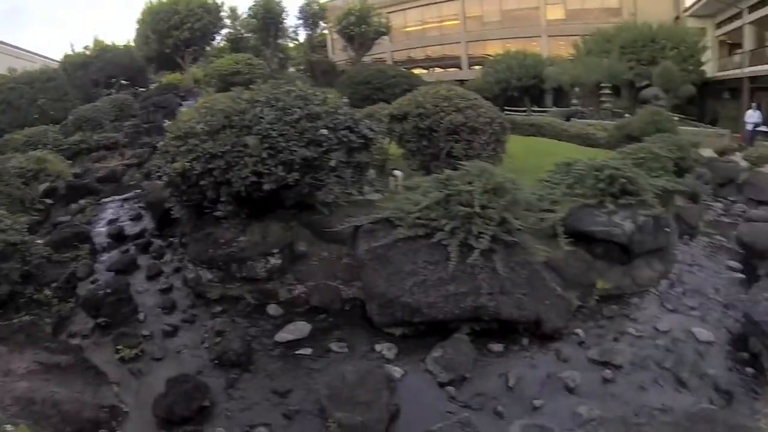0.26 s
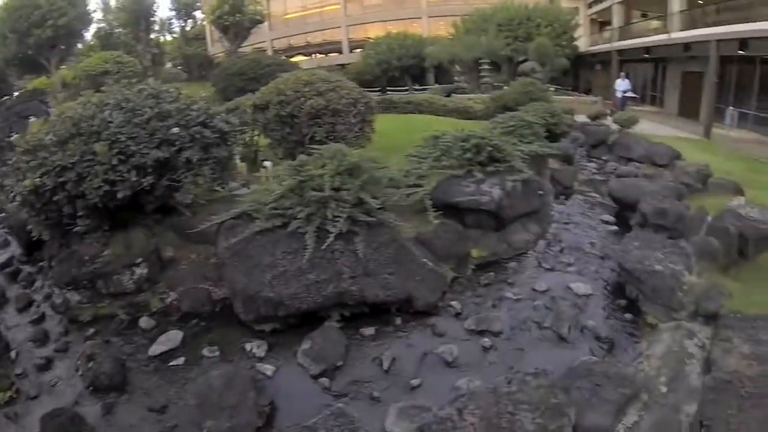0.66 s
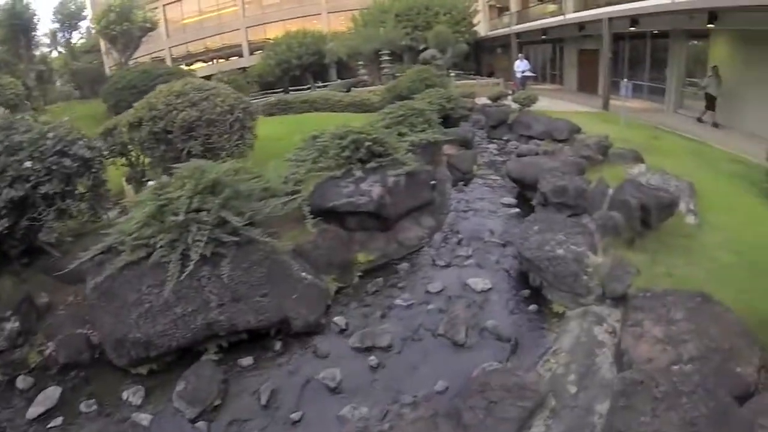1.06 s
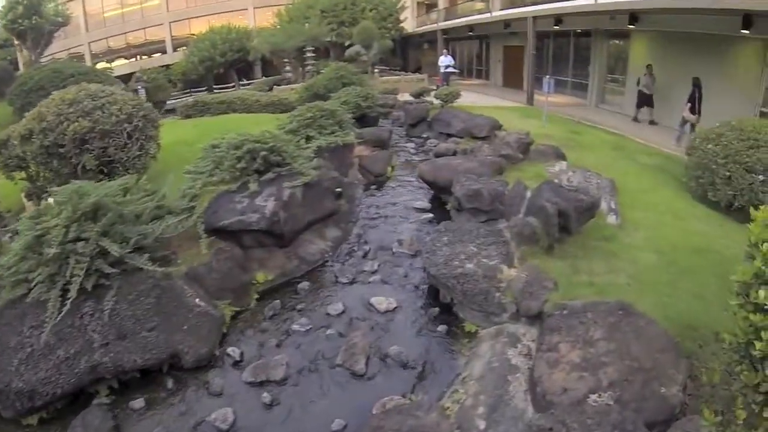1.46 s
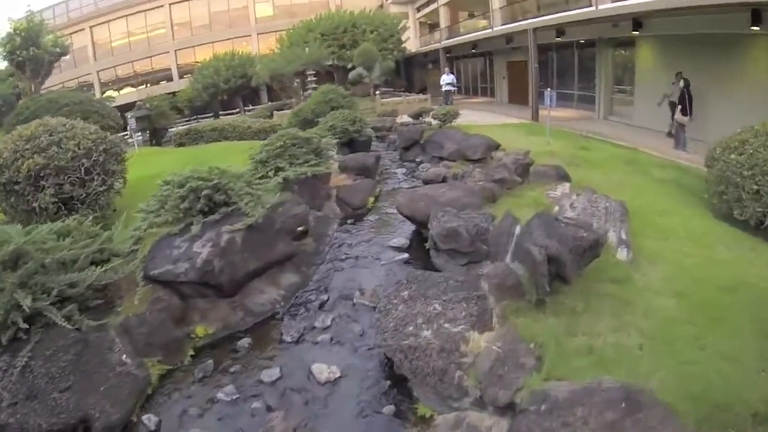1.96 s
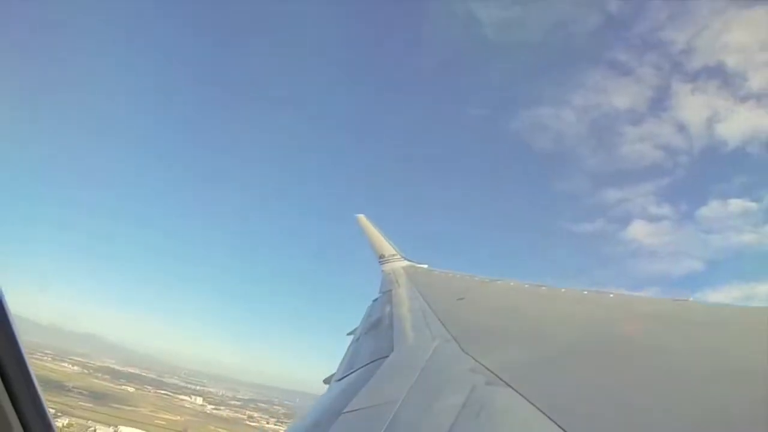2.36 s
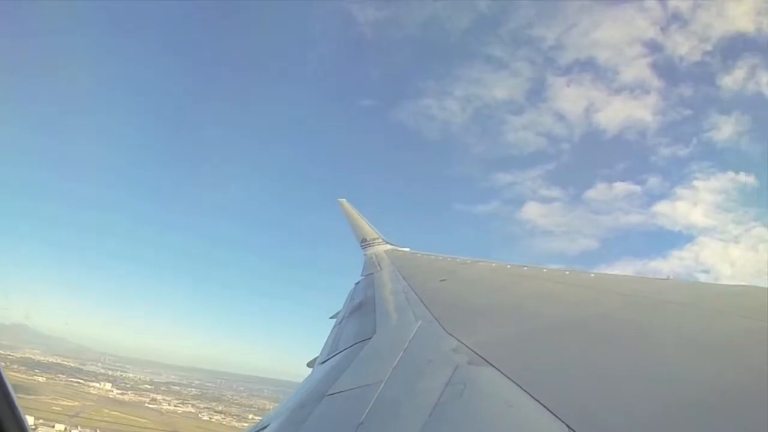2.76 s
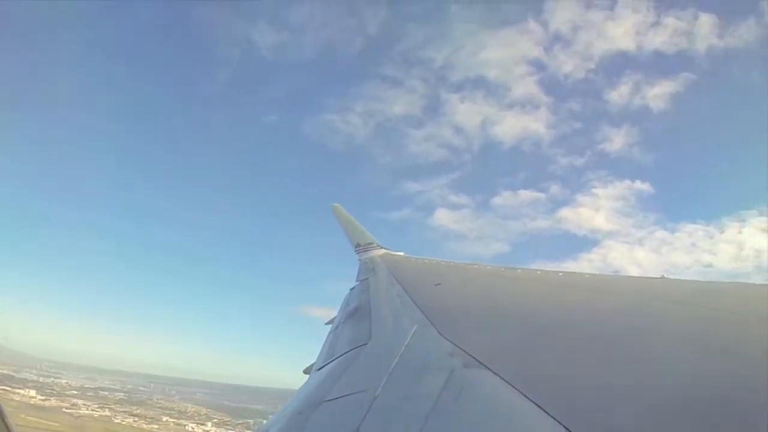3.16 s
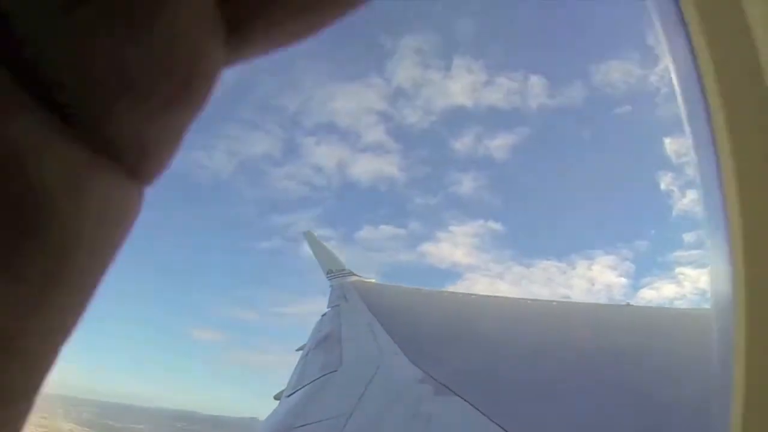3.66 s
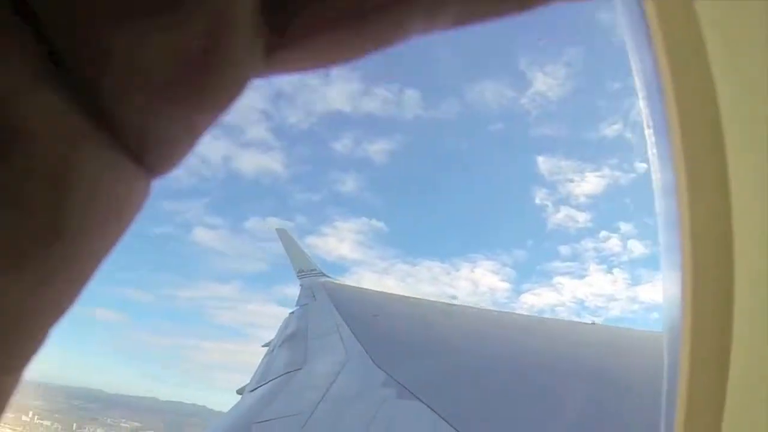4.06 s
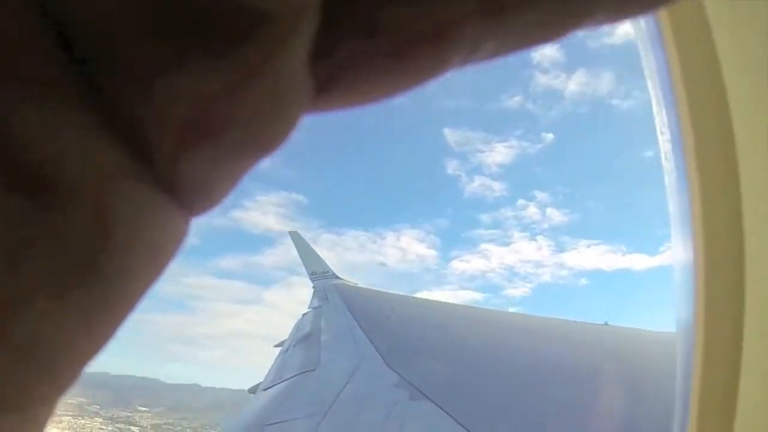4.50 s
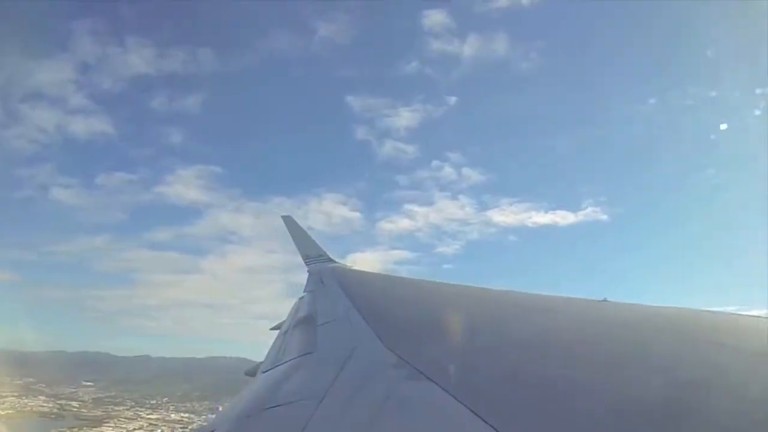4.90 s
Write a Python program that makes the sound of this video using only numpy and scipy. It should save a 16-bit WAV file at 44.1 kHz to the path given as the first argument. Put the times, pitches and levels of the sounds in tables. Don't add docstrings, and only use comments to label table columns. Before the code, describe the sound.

For the first two seconds, wind presses on a cased camera microphone in a garden: deep, lumpy, fluttering rumble, with only a dull, faint hush of distant air and water and a barely perceptible high electronic pulse. A cluster of small knocks comes near 0.2 s, another at 1.1 s, and a strong thump at 1.75 s. It fades to near silence around 2.05 s, and by 2.15 s a steady jet cabin roar has arrived, hollow and ringing through the window pane, with engine hum, faint fan whine and fine hiss. A soft bump comes at 3.55 s; around 3.6 s the roar swells briefly, then the ringing drops as the case lifts off. Finger ticks and brushes follow, an airy vent puff opens at 4.3 s with a faint thin whistle, and a sharp click with scratchy rubbing hits at 4.6-4.7 s. The case settles back, ringing returns, and the lows are thinner to the end.

```python
import sys
import numpy as np
from scipy import signal
from scipy.fft import rfft, irfft, next_fast_len
from scipy.io import wavfile
from scipy.ndimage import uniform_filter1d

SR = 44100
rng = np.random.default_rng(int(sys.argv[2]) if len(sys.argv) > 2 else 0)


def dump_mix(stems):
    frames = np.atleast_2d(stems).T
    limited = np.clip(frames, -1, 1)
    pcm = np.round(limited * 32767).astype(np.int16)
    wavfile.write(sys.argv[1], SR, pcm)


def amplitude_ratio(level_db):
    exponent = np.asarray(level_db, float) / 20
    return 10 ** exponent


N = 226432


def rms_one(x):
    return x / np.sqrt(np.mean(x ** 2) + 1e-30)


def in_time(rows):
    s, *columns = np.transpose(rows)
    return [np.interp(np.arange(N) / SR, s, column) for column in columns]


def ramp(start_s, end_s):
    return np.interp(np.arange(N) / SR, [start_s, end_s], [0, 1])


def drift(rate):
    r = np.exp(-80 * np.pi * rate / SR)
    slow = signal.lfilter([1], [1, -2 * r, r * r], rng.standard_normal(N // 40 + 2002))
    slow = slow[2000:]
    return np.interp(np.arange(N) / 40, np.arange(len(slow)), rms_one(slow))


def coloured(spectrum, patchy_db, low_hz, high_hz):
    size = next_fast_len(N, True)
    hz = np.maximum(np.fft.rfftfreq(size, 1 / SR), 1)
    point_hz, point_db = np.transpose(spectrum)
    level_db = np.interp(np.log(hz), np.log(point_hz), point_db)
    shape = rfft(rng.standard_normal(size)) * amplitude_ratio(level_db)
    in_band = irfft(shape * (hz > low_hz) * (hz < high_hz), size)
    out = np.zeros(N)
    for octave in range(int(np.log2(point_hz[0])), int(np.log2(point_hz[-1])) + 2):
        overlap = np.clip(1 - abs(np.log2(hz) - octave), 0, 1)
        out += irfft(shape * overlap, size)[:N] * amplitude_ratio(patchy_db * drift(8.2))
    return out / np.sqrt(np.mean(in_band ** 2))


def resonance(x, hz, width_hz):
    r = np.exp(-np.pi * width_hz / SR)
    zeros = np.array([1, 0, -1]) * (1 - r * r) / 2
    poles = [1, -2 * r * np.cos(2 * np.pi * hz / SR), r * r]
    return signal.lfilter(zeros, poles, x)


def ring_twice(x, hz, width_hz):
    return rms_one(resonance(resonance(x, hz, width_hz), hz, width_hz))


def whistle(hz, width_hz):
    return ring_twice(rng.standard_normal(N), hz, width_hz)


def tone(hz):
    return np.sqrt(2) * np.sin(2 * np.pi * (np.cumsum(hz + np.zeros(N)) / SR + rng.random()))


# f/Hz, level/dB per Hz
BUFFET_SPECTRUM = [(5.9, 3.5), (10, -1.5), (22, 1), (40, -9.5), (94, -23.5), (151, -39), (355, -55.5),
                   (411, -49), (500, -62), (650, -89), (1100, -120)]
# t/s, level/dB
GUST_STRENGTH = [(0.0, -24.5), (0.1, -34), (0.2, -26), (0.38, -29.5), (0.56, -22.5), (0.61, -33),
                 (0.66, -20), (0.75, -26), (0.86, -23), (1.2, -26.5), (1.28, -33), (1.35, -30),
                 (1.52, -32.5), (1.63, -20.5), (1.74, -31), (1.8, -23), (2.0, -21)]


def wind():
    gust_db, = in_time(GUST_STRENGTH)
    low_cut = signal.butter(2, 9, "high", fs=SR, output="sos")
    lumps = signal.sosfiltfilt(low_cut, coloured(BUFFET_SPECTRUM, 0.3, 10, 45))
    slow = signal.sosfiltfilt(signal.butter(4, 45, fs=SR, output="sos"), lumps)
    flutter = rms_one(lumps - slow)
    size = np.sqrt(uniform_filter1d(slow ** 2, size=3500) + 0.073)
    mean_gust_db = np.mean(np.array(GUST_STRENGTH)[:, 1])
    flutter_db = -36.5 + .1 * (gust_db - mean_gust_db)
    ebb_s = .008
    ebb = amplitude_ratio(-20) * np.exp(-np.arange(N) / SR / ebb_s)
    return ebb + ramp(0, 2 * ebb_s) * (amplitude_ratio(gust_db + 2.5) * slow / size + amplitude_ratio(flutter_db) * flutter)


# t/s, level/dB, push f/Hz, sign, rebound share
CASE_KNOCKS = [(0.21, -23.5, 550, -1, .2), (0.226, -26, 450, -1, 0.22), (0.2365, -26.5, 660, 1, 0.34),
               (0.247, -28, 600, -1.1, .2), (0.254, -33, 302, -1, .2), (1.116, -21, 495, 0.71, 0.45),
               (1.753, -30.5, 895, -0.89, .1), (1.754, -11.5, 600, 0.96, 0.2), (3.549, -22, 150, 1, .1),
               (4.154, -27, 500, 1, .1), (4.6276, -5, 3200, -0.78, 0.41)]


def knocks():
    out = np.zeros(N)
    for s, db, hz, sign, rebound in CASE_KNOCKS:
        rise = np.arange(int(25 * SR / hz)) * hz / SR
        late = np.maximum(rise - 1.6, 0) / 1.6
        push = (rise * np.exp(1 - rise)) ** 3
        swing_back = rebound * late * np.exp(1 - late)
        out[int(s * SR):][:len(push)] += sign * amplitude_ratio(db) * (push - swing_back)
    return signal.sosfilt(signal.butter(1, 60, "high", fs=SR, output="sos"), out)


# f/Hz, level/dB per Hz
ROAR_SPECTRUM = [(150, -50), (250, -10.5), (300, -10.5), (385, 1), (450, -6.5), (520, -17), (640, -6),
                 (800, -10), (960, -8), (1100, -8.5), (1430, -19.5), (2400, -120)]
# f/Hz, level/dB per Hz
UPPER_SPECTRUM = [(590, -7.5), (1000, -8), (1090, -21), (1190, -7), (1430, -13.5), (1590, -14),
                  (1810, -18.5), (2000, -13), (2370, -16), (2600, -22.5), (2940, -22.5), (3380, -32),
                  (5000, -65), (6500, -77), (11000, -120)]
# f/Hz, level/dB per Hz
HISS_SPECTRUM = [(2350, -11), (4000, -4), (4580, -11.5), (6820, -14.5), (7060, -16.5), (7560, -13.5),
                 (9120, -14.5), (9330, -12.5), (10700, -8), (11900, -0.5), (13100, -7), (14300, -9),
                 (15600, -14)]
# f/Hz, width/Hz, level/dB
PANE_MODES = [(84, 78, -24.5), (391.6, 39, -9.5), (502, 54, -9), (959, 73, -1.5), (1320, 110, -18.5),
              (1572, 57, -19.5), (1753, 17, -24.5)]
# f/Hz, width/Hz, level/dB
PANE_MODES_AGAIN = [(93, 52, -13.5), (383, 49, -7.5), (475, 31, -8), (931, 63, -1), (1073, 44, -8.5),
                    (1333, 88, -11), (1795, 15, -17.5), (2186, 54, -17)]
# t/s, level/dB
PANE_CONTACT = [(2.14, -25.5), (2.35, -24.5), (2.44, -27.5), (2.5, -24.5), (3.05, -28), (3.15, -23),
                (3.4, -25), (3.48, -34.5), (3.6, -21.5), (3.65, -35.5), (4.01, -40.5), (4.27, -40.5),
                (4.48, -44), (4.81, -33), (5.05, -24.5), (5.09, -31.5), (5.13, -23.5)]
# start t/s, end t/s
LIFT_S, SET_BACK_S = (3.6, 3.67), (4.73, 4.96)


def pane_ring(modes):
    return sum(amplitude_ratio(db) * whistle(hz, 1.73 * width_hz) for hz, width_hz, db in modes)


def cabin():
    t = np.arange(N) / SR
    pane_db, = in_time(PANE_CONTACT)
    firmer_db = pane_db + 25
    roar_db = -33.5 - 0.04 * firmer_db
    upper_db = -34.5 + .2 * firmer_db
    hiss_db = -53 + 0.058 * firmer_db
    roar_db += 4 * np.exp(-((t - 3.59) / 0.071) ** 2)
    roar_db -= 9 * ramp(*SET_BACK_S)
    moved_s = 4.3
    pane = np.where(t < moved_s, pane_ring(PANE_MODES), pane_ring(PANE_MODES_AGAIN))
    out = amplitude_ratio(roar_db - 1.5) * coloured(ROAR_SPECTRUM, 1.0, 200, 780)
    out += amplitude_ratio(pane_db - 1.5) * pane
    out += amplitude_ratio(upper_db) * coloured(UPPER_SPECTRUM, 0.8, 1180, 4000)
    return out + amplitude_ratio(hiss_db) * coloured(HISS_SPECTRUM, 0.63, 8200, 15200)


# f/Hz, width/Hz
PORT_RESONANCES = [(4000, 1800), (5700, 1600), (8000, 3400), (12500, 4700)]
# t/s, length/s, level/dB
FINGER_TICKS = [(2.571, .006, -43), (3.853, .0033, -41), (4.154, .0027, -40), (4.205, .003, -44),
                (3.838, .012, -51)]
FINGER_BRUSHES = [(3.74, .026, -54), (3.874, 0.02, -53), (4.211, 0.022, -54), (4.6, 0.024, -51),
                  (4.645, 0.012, -32), (4.658, .044, -33.5), (4.701, .013, -38)]
FINGER_TAPS = [(3.69, .02, -60), (3.823, 0.029, -51.5), (3.853, .0033, -48), (4.632, .012, -53)]
FINGER_PRESSES = [(4.315, .015, -47), (4.618, 0.031, -41), (4.718, 0.026, -47.5)]
FINGER_SNAPS = [(2.527, .012, -58), (3.547, .013, -45)]
SNAP_COLOUR = (-19, -0.5, -3, -8)


def rubs():
    kinds = [  # touches, level/dB in each of the four resonances
        (FINGER_TICKS, (-33, -17, -18, 0.5)),
        (FINGER_BRUSHES, (-29, -6.5, -14.5, 0.5)),
        (FINGER_TAPS, (-18, 1, -14, -6)),
        (FINGER_PRESSES, (-7, -12, -14, 1.5)),
        (FINGER_SNAPS, SNAP_COLOUR)]
    gates = np.zeros((len(PORT_RESONANCES), N))
    for touches, colour_db in kinds:
        for s, length, db in touches:
            gates[:, int(s * SR):int((s + length) * SR)] += amplitude_ratio(db + np.array(colour_db))[:, None]
    gates = uniform_filter1d(gates, size=130) * amplitude_ratio(1.2 * drift(200))
    slips_per_s, slip_share = 1100, .5
    slips = (rng.random(N) < slips_per_s / SR) * rng.standard_normal(N) + 1e-18
    out = np.zeros(N)
    for gate, (hz, width_hz) in zip(gates, PORT_RESONANCES):
        smooth = whistle(hz, width_hz)
        grains = ring_twice(slips, hz, width_hz)
        out += gate * (smooth + slip_share * grains)
    return out / np.sqrt(1 + slip_share ** 2)


# f/Hz, level/dB per Hz
SHAKE_SPECTRUM = [(12, -66), (20, -32), (52, -8), (86, -9.5), (119, -1), (160, 1), (260, -3), (340, -15),
                  (570, -120)]
# f/Hz, level/dB per Hz
OPEN_AIR_SPECTRUM = [(1900, -30), (2400, 1), (2600, 5.5), (2900, -10), (3500, -16), (5300, -21.5),
                     (6500, -37), (10000, -20.5), (13500, -17), (15700, -21)]


def airframe():
    t = np.arange(N) / SR
    shake_db = -44 - 6 * ramp(*SET_BACK_S)
    shake = amplitude_ratio(shake_db) * coloured(SHAKE_SPECTRUM, 0.58, 30, 184)
    opens_s, shuts_s = 4.312, 5.03
    puff_db = 5.5 * np.exp(-np.maximum(t - opens_s, 0) / 0.031)
    closing_db = 150 * np.maximum(t - shuts_s, 0)
    vent = amplitude_ratio(-43 + puff_db - closing_db) * coloured(OPEN_AIR_SPECTRUM, 0.62, 2000, 15000)
    return shake + ramp(opens_s, opens_s + .008) * vent


# t/s, f/Hz
SPOOL_PITCH = [(2.1, 575), (3.4, 575), (3.66, 568), (3.85, 547), (4.3, 546), (4.6, 553), (5.13, 559)]
# level/dB at the pane, in the hand, at the second spot
SPOOL_MULTIPLES = [(-44, -38.5, -35), (-48, -55, -50), (-59, -66, -63)]
# multiple, level/dB at the pane, level/dB in the hand
FAN_MULTIPLES = [(3, -71.5, -76), (4, -71.5, -68), (5, -67, -65), (6, -79, -82)]
# f/Hz, level/dB
FAINT_TONES = [(4275, -74), (11972, -70), (12581, -73), (14287, -78)]


def whine():
    spool_hz, = in_time(SPOOL_PITCH)
    in_hand, back = ramp(*LIFT_S), ramp(*SET_BACK_S)
    out = np.zeros(N)
    for multiple, (pane_db, hand_db, again_db) in zip((1, 4, 5), SPOOL_MULTIPLES):
        db = pane_db + (hand_db - pane_db) * in_hand + (again_db - hand_db) * back
        out += amplitude_ratio(db + drift(2.5)) * tone(multiple * spool_hz)
    fan_hz = 2412 + drift(8.1)
    for multiple, pane_db, hand_db in FAN_MULTIPLES:
        db = pane_db + (hand_db - pane_db) * in_hand
        out += amplitude_ratio(db + drift(4.2)) * tone(multiple * fan_hz)
    for hz, db in FAINT_TONES:
        out += amplitude_ratio(db + 2 * drift(3)) * tone(hz + 5 * drift(6))
    leak_hz, edge_s = 8100, 0.018
    leak = .7 * whistle(leak_hz, 260) + .6 * tone(leak_hz + 60 * drift(40))
    for start_s, end_s in [(4.37, 4.62), (4.74, 5.03)]:
        leaking = ramp(start_s, start_s + edge_s) - ramp(end_s - edge_s, end_s)
        out += amplitude_ratio(-61.5) * leaking * leak
    return out + amplitude_ratio(-64 + 2 * drift(6)) * whistle(12020, 200)


# f/Hz, level/dB per Hz
GARDEN_SPECTRUM = [(150, -55), (250, -16.5), (352, -14), (408, -19.5), (575, -21), (624, -19.5),
                   (1040, -19), (1090, -14.5), (1320, -9.5), (1480, -2), (1800, -10), (2120, -26),
                   (2850, -21.5), (5850, -34.5), (12400, -45.5), (16100, -71), (22000, -120)]
# f/Hz, width/Hz, level/dB
CASE_HUMS = [(4210, 36, -75.5), (7300, 300, -82), (2885, 190, -65.5), (3106, 110, -71.5),
             (10900, 990, -82.5), (13150, 700, -81)]


def garden():
    air = coloured(GARDEN_SPECTRUM, 0.39, 1000, 5000) * amplitude_ratio(-49)
    for hz, width_hz, db in CASE_HUMS:
        air += amplitude_ratio(db) * whistle(hz, width_hz)
    air = signal.sosfilt(signal.ellip(8, 1, 50, 13480, fs=SR, output="sos"), air)
    frames_per_s, readout_start, readout_share = 47.96, .46, .38
    reading = (np.arange(N) / SR * frames_per_s - readout_start) % 1 < readout_share
    gate = uniform_filter1d(reading * 1., size=60)
    return air + amplitude_ratio(-71.5 + 1.5 * drift(30)) * gate * tone(12860)


def scene():
    t = np.arange(N) / SR
    fade_out_s, change_s, fade_in_s = 1.94, 2.058, 2.159
    outdoors = np.interp(t, [fade_out_s, change_s], [1, 0])
    aboard = np.interp(t, [change_s, fade_in_s], [0, 1]) ** 0.92
    inside = cabin() + airframe() + whine() + rubs()
    return (outdoors * (wind() + garden()) + aboard * inside + knocks())[None]


def top_cut(x):
    return signal.sosfilt(signal.butter(12, 15710, fs=SR, output="sos"), x)


def record(dry):
    finished = signal.sosfilt(signal.ellip(10, .5, 45, 15740, fs=SR, output="sos"), dry)
    return top_cut(finished)


dry = scene()
out = record(dry)
dump_mix(out)
```